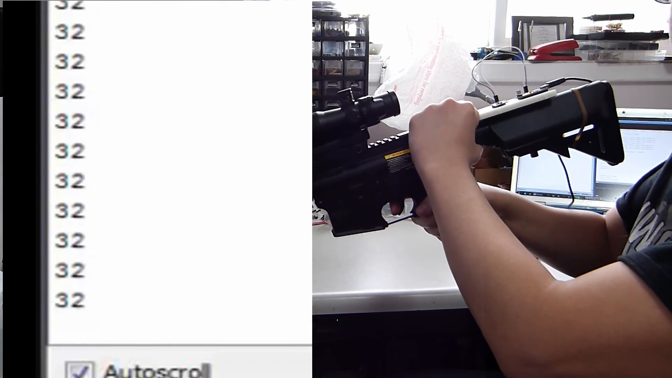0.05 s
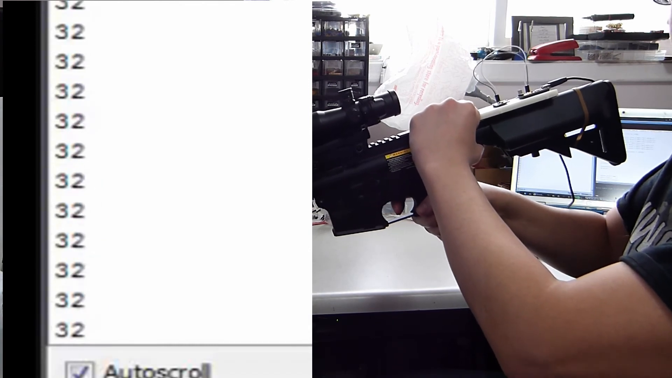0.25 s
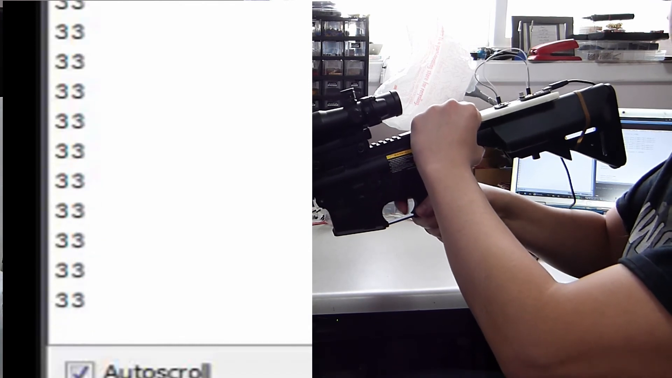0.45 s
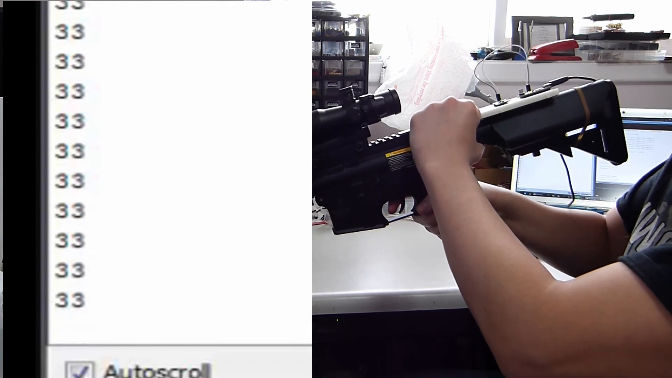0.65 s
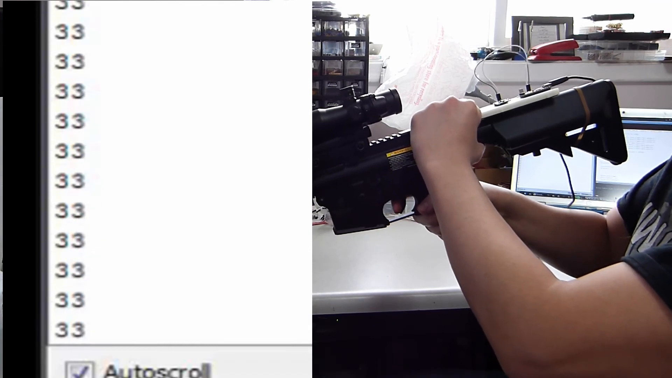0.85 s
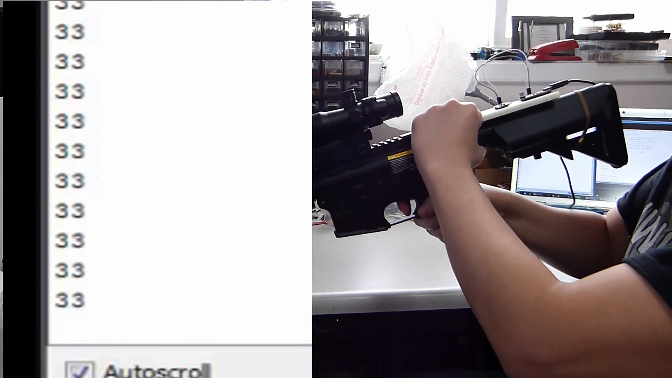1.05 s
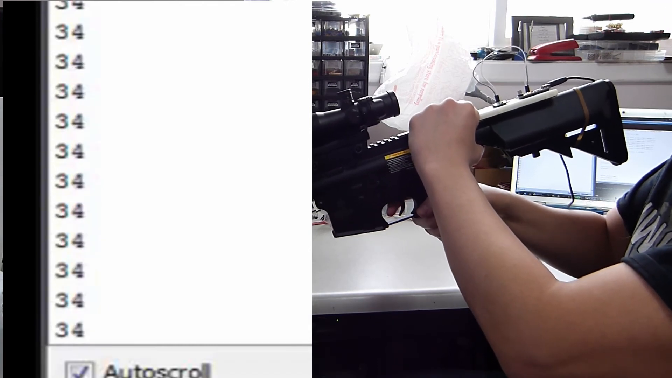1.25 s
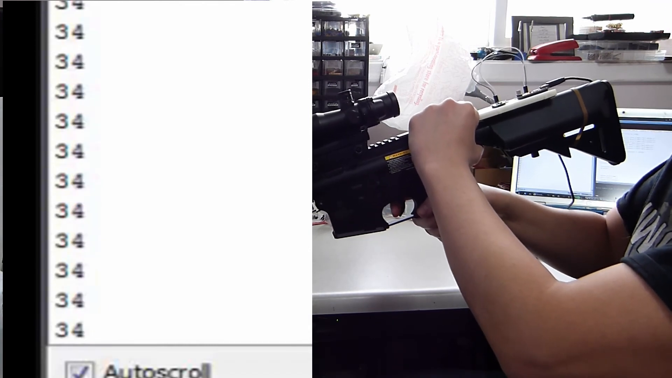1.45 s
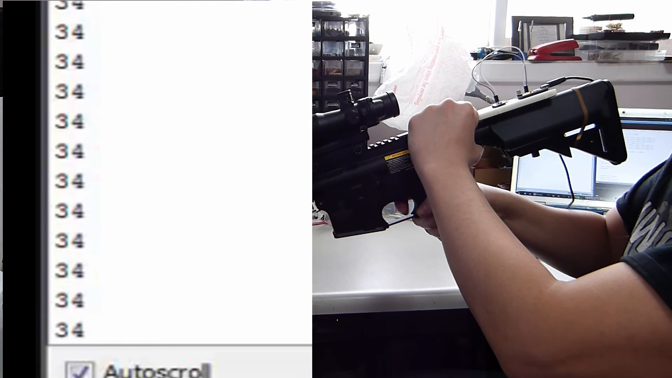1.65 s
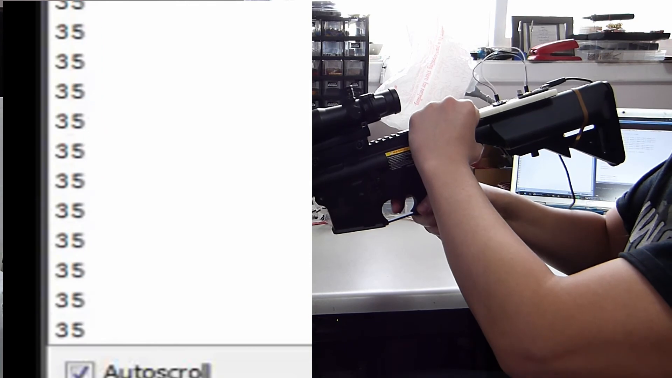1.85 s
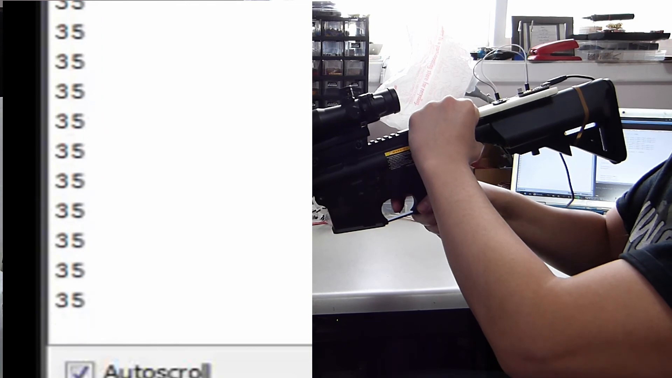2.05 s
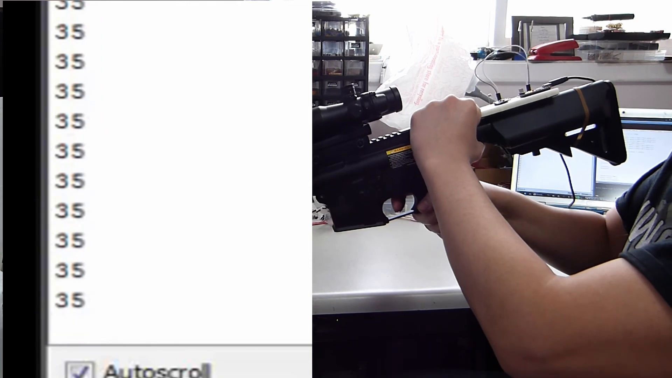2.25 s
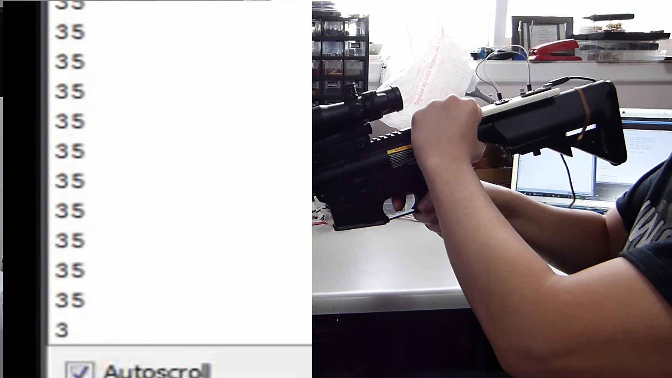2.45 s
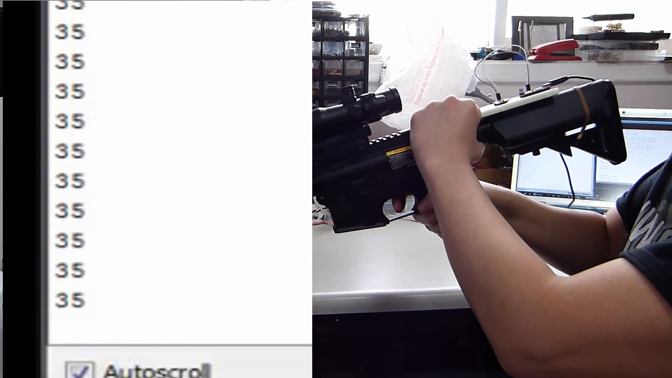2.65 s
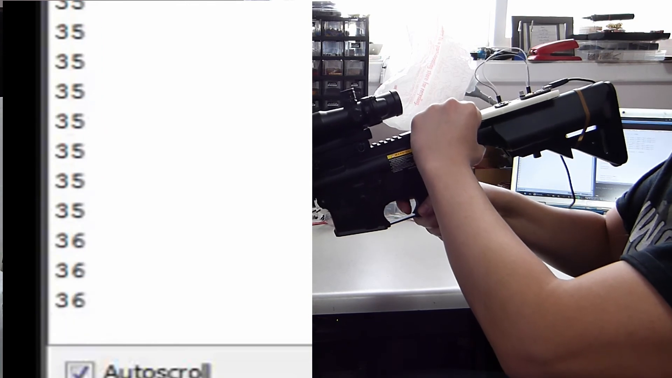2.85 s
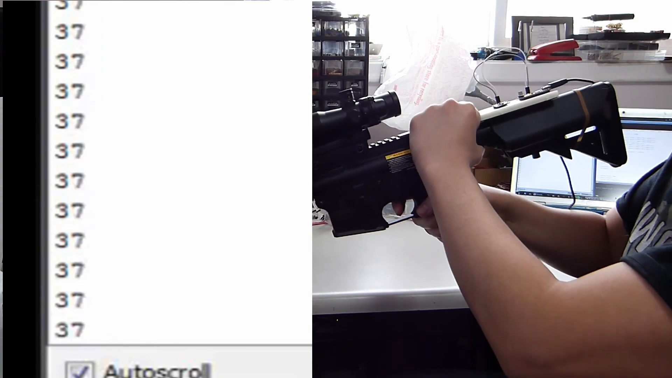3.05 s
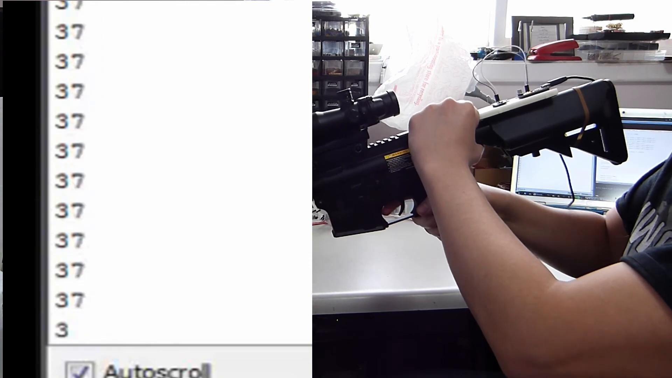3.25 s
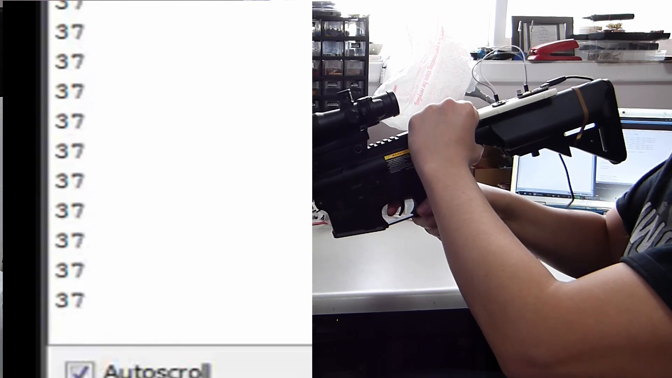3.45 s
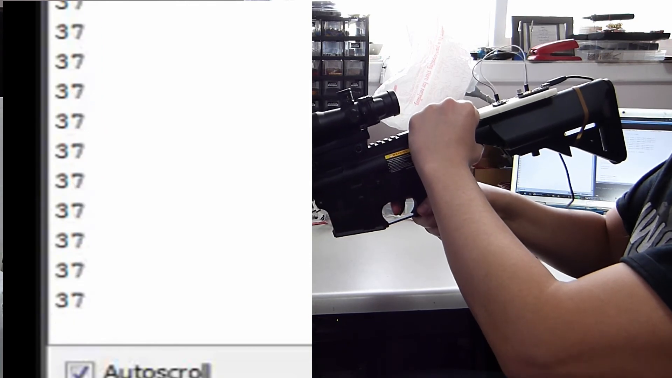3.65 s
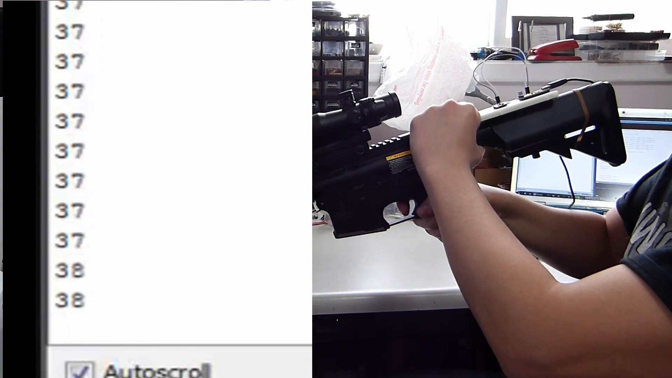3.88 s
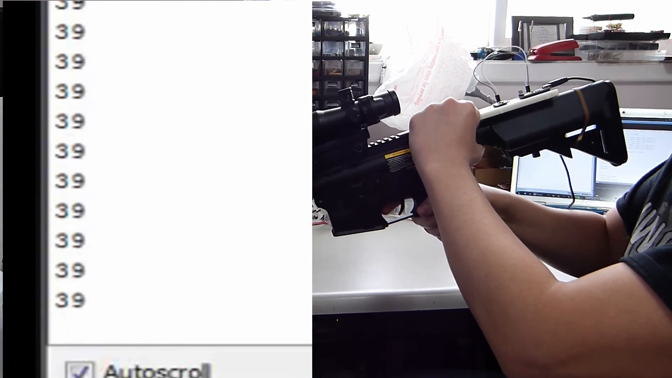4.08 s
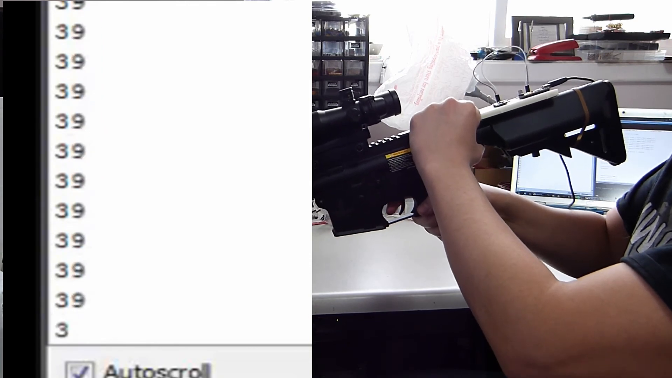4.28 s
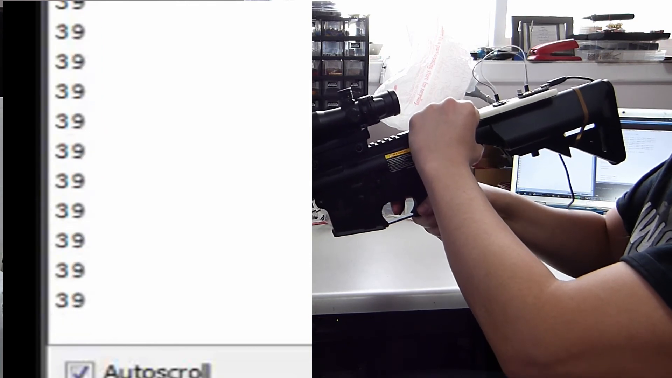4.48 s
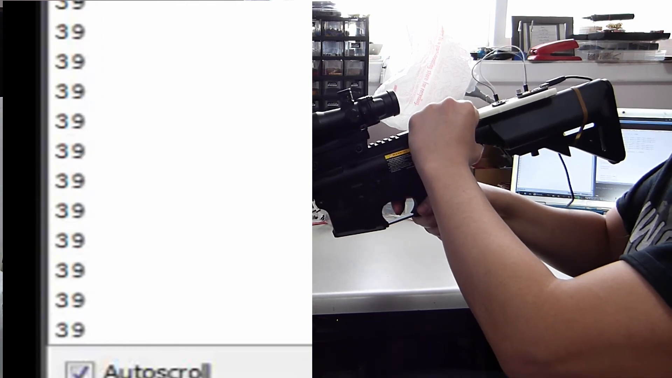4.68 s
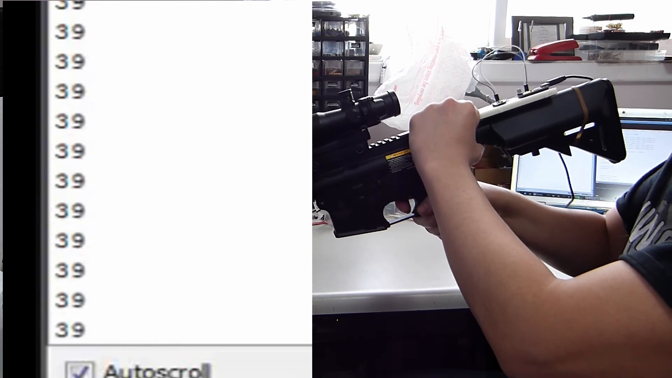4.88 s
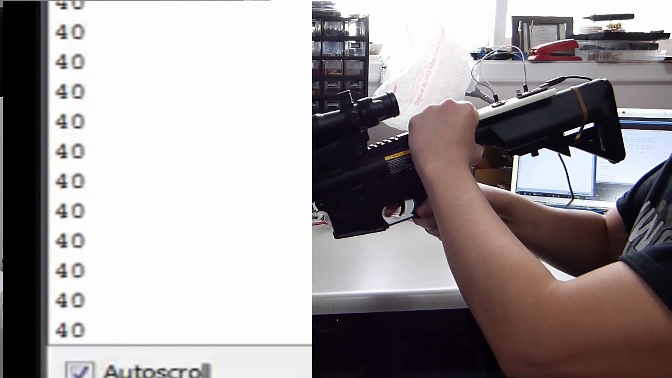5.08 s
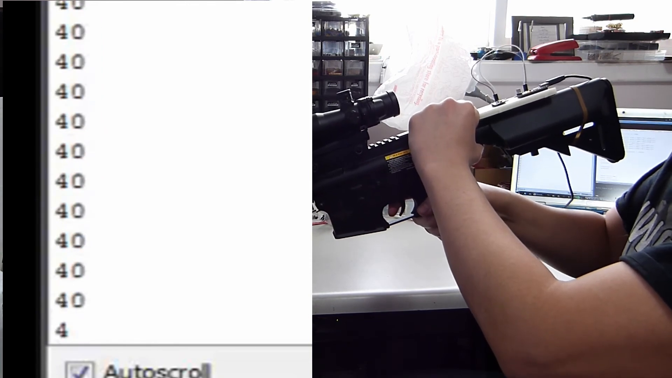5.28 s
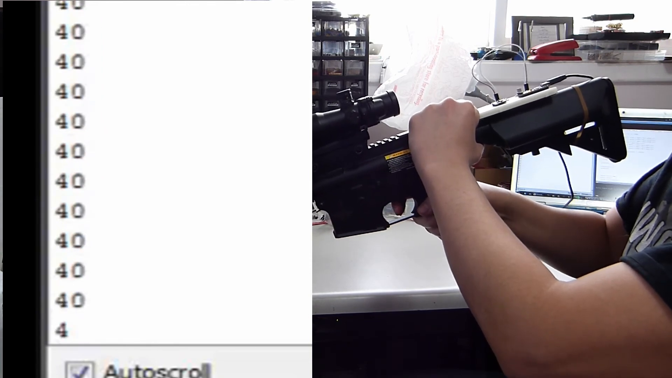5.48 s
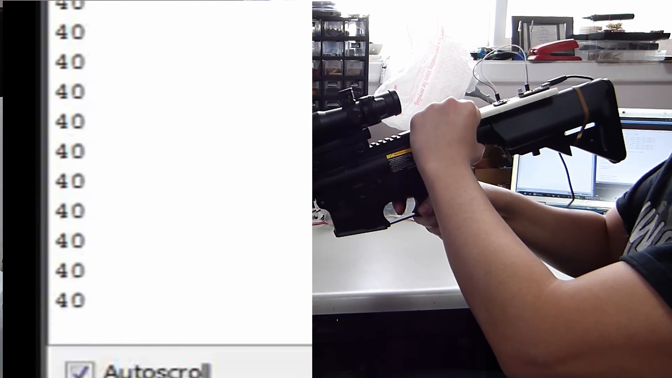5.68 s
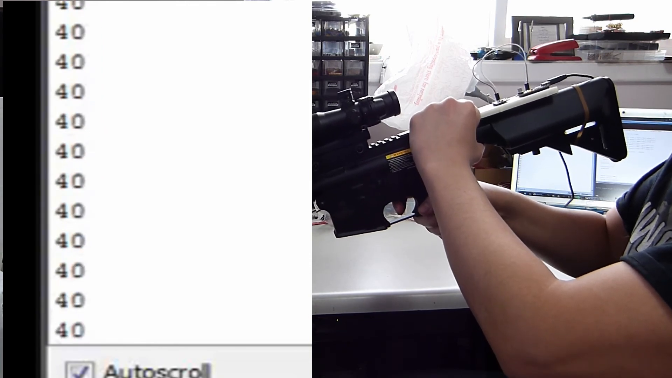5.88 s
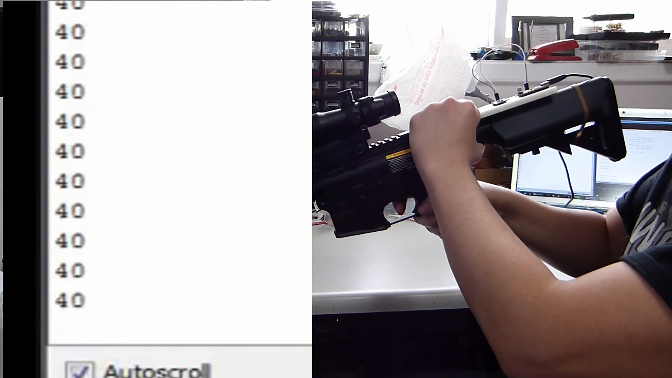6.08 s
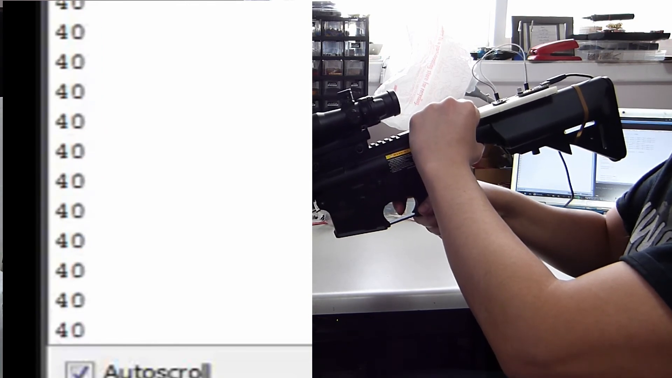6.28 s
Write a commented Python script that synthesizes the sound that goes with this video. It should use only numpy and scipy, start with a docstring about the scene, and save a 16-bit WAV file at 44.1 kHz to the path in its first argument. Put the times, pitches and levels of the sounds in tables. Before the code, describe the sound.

A close stereo microphone in a small, reflective workroom. At the start the ring of an earlier shot is still dying away over soft, low computer fan air and faint steady tones. At about 0.4 s a trigger clicks, a motor spins up with a gritty, rising gear grind lasting about a tenth of a second, and at 0.5 s the piston slams with a hard, bright crack and a rapid bouncing clatter. The same follows at 1.2 s and, after a very faint high squeak near 1.65 s, at 1.9 s. A longer pause leads to a quick pair at 3.0 and 3.1 s, the motor running through both, then another pair at 3.95 and 4.1 s. A last single lands at 5.1 s. Each blast leaves a short room tail and a faint metallic spring ring; the fan sinks, then slowly swells back until the end around 6.4 s.

```python
"""Electric airsoft rifle in a small workroom

Six trigger pulls fire the rifle, two of them running on into a second shot; a faint squeak precedes the third.
The trigger clicks, the motor spins the gears up against the spring, and the piston slams home and bounces.
The room rings on, at first still fading from an earlier shot, over a computer fan (coloured noise) and faint
steady tones that sink and swell with the recorder's gain."""
import sys
import numpy as np
from scipy import signal
from scipy.io import wavfile

SR = 44100
rng = np.random.default_rng(int(sys.argv[2]) if len(sys.argv) > 2 else 0)


def unload_wav(signal):
    """Save mono or channel-first audio to the path in sys.argv[1] as 16-bit WAV at rate SR, clipped to [-1, 1]."""
    wavfile.write(
        sys.argv[1],
        SR,
        np.round(np.clip(np.atleast_2d(signal).T, -1, 1) * 32767).astype(np.int16),
    )


N = 279153
LEAD = SR // 2  # samples ahead of the start, for the earlier shot
TIME = np.arange(-LEAD, N) / SR

# trigger pulls: (click [s], click level [dB], motor on [s], motor off [s])
PULLS = [(-.29, -45, -.26, -.145), (.389, -43, .412, .528), (1.074, -40, 1.098, 1.206),
         (1.733, -42, 1.755, 1.873), (2.861, -45, 2.888, 3.118), (3.826, -42, 3.846, 4.079),
         (4.939, -51, 4.973, 5.086)]
# shots: (piston blow [s], wind-up before it [s], grind [dB], hiss [dB], gear mesh [dB], crack [dB], thump [dB])
SHOTS = [(-.146, 0.081, -5, -1, 1.5, -2, -3.5), (0.5254, 0.12, -0.5, -1.1, 1, -1.5, -0.5),
         (1.2043, 0.11, 0, -2, -0.5, -0.5, .5), (1.8705, 0.12, -2.5, 0, 1, -1, -1.5),
         (3.0, .11, 4.5, 1.5, -3, 1, 0.5), (3.1158, .072, 0.5, -1.5, -11, 2.5, -1),
         (3.962, 0.12, 1.1, 0, 0, 1, -1), (4.0768, 0.078, -5.5, -1.5, -9, 2.5, -3),
         (5.0839, 0.11, 0.5, -1.5, 0.5, 2.5, .5)]


def piston(crack_db=2.5, crack_t60_s=.017, thump_db=7, rush_db=-14.5, rush_rise_s=0.0077, rush_hz=(130, 420),
           low_cut_hz=145, spring_db=-4):
    """The piston drives air down the barrel, hits the cylinder head and rebounds; body and spring ring."""
    # impact noise spectrum: (frequency [Hz], density [dB])
    crack_colour = [(50, -15), (200, -0.5), (600, -0.5), (2000, 0), (4000, -1), (7500, 3.5), (10000, 0.5),
                    (13000, -5), (15500, -14)]
    # rifle body modes: (frequency [Hz], level [dB], t60 [s])
    body_modes = [(132, -25, .04), (250, -14, 0.025), (300, -23.5, 0.032), (438, -15, 0.023),
                  (733, -30.5, 0.25), (770, -19, .03), (1460, -18, 0.023)]
    # spring and small steel parts: (frequency [Hz], level [dB], t60 [s])
    spring_modes = [(3260, -71.5, 1.2), (5497, -67, 1.3), (7190, -68, 1.3), (8000, -67.5, 2),
                    (8700, -65.5, 1.3)]
    blow_s, *_, shot_crack_db, shot_thump_db = np.transpose(SHOTS)
    crack = rattle(impacts(blow_s, shot_crack_db + crack_db), crack_colour, crack_t60_s)
    blows = clicks(blow_s, shot_thump_db + thump_db)
    # the puff of air swells as the piston gathers speed
    swell = sum(from_db(db) * (TIME < at) * np.exp(-np.abs(TIME - at) / rush_rise_s)
                for at, db in zip(blow_s, shot_thump_db))
    band = signal.butter(2, rush_hz, "band", fs=SR, output="sos")
    air = signal.sosfilt(band, rng.standard_normal((3, len(TIME))))
    air = unit_rms(air[0] + .8 * air[1:])  # one shared noise, one per channel
    low = ring(blows, body_modes) + from_db(rush_db) * swell * air
    low = signal.sosfilt(signal.butter(2, low_cut_hz, "high", fs=SR, output="sos"), low)
    low = low * from_db([[-1.2], [1.2]])
    return crack + low + from_db(spring_db) * ring(blows, spring_modes)


def impacts(times, db, count=4, contact_s=.003, contact_db=2.5, rebound_s=.0078, rebound_shrink=.9,
            rebound_db=-1, rebound_loss_db=4.5):
    """The piston presses into the cylinder head, then rebounds ever sooner and softer."""
    k = np.arange(count)
    gaps_s = rebound_s * rebound_shrink ** k * (1 + 0.07 * rng.standard_normal((len(times), count)))
    rebound_times = times[:, None] + np.cumsum(gaps_s, axis=1)
    rebound_levels_db = db[:, None] + rebound_db - rebound_loss_db * k
    rebounds = clicks(rebound_times.ravel(), rebound_levels_db.ravel())
    pressed = sum(from_db(level + contact_db) * (TIME >= s) * (TIME < s + contact_s)
                  for s, level in zip(times, db))
    return pressed / np.sqrt(contact_s * SR) + rebounds


def gears(jitter=.14, uneven_db=3, grit_per_s=3300, grit_db=3, low_cut_hz=520, free_run_db=-16.5,
          grind_level_db=-13, hiss_level_db=-12, mesh_level_db=-22):
    """Teeth knock at a rising rate, sweeping through the shell's modes, while their flanks grind and hiss."""
    # gearbox shell modes: (frequency [Hz], level [dB], t60 [s])
    shell_modes = [(545, -21.5, 0.057), (643, -12, .05), (753, -9.5, .06), (806, -1, .05),
                   (1000, -15, 0.01), (1215, -10.5, 0.048), (1485, -11.5, .025), (1537, -12.5, 0.022),
                   (2953, -12, 0.024), (3330, -8, 0.038), (3914, -11.5, 0.025), (4140, -14, .05),
                   (4440, -12, .025), (5550, -17, 0.043), (6330, -12.5, .05), (7490, -13, 0.014)]
    # noise spectrum of the grinding: (frequency [Hz], density [dB])
    grind_colour = [(100, -42), (330, -24.5), (560, 0), (850, 5.5), (1300, 4.5), (2200, 1.5), (3400, 4),
                    (5500, -1), (8000, -6.5), (11500, -6), (15000, -23.5)]
    # noise spectrum of the hiss: (frequency [Hz], density [dB])
    hiss_colour = [(100, -38), (300, -21.5), (650, -7.5), (2000, -5), (4000, -0.5), (7000, 1.5),
                   (10500, 0.5), (13000, -6), (15500, -16)]
    _, _, grind_db, hiss_db, mesh_db, _, _ = np.transpose(SHOTS)
    teeth_per_s, speed = motor()
    free = from_db(free_run_db) * speed
    grind_load = strain(grind_db, rise_s=.034, power=1.55, ease_db_per_s=39.5)
    hiss_load = strain(hiss_db, rise_s=.052, power=2.9, ease_db_per_s=15.5)
    mesh_load = strain(mesh_db, rise_s=0.021, power=1.6, ease_db_per_s=30)
    grind = from_db(grind_level_db) * (free + grind_load)
    hiss = from_db(hiss_level_db) * (free * speed + hiss_load)
    mesh = from_db(mesh_level_db) * (free + mesh_load)
    # backlash makes the teeth land unevenly in time and strength
    wobble = np.exp(jitter * flutter(size=50))
    teeth_passed = np.floor(np.cumsum(teeth_per_s * wobble) / SR)
    teeth = np.diff(teeth_passed, prepend=0) * from_db(uneven_db * rng.standard_normal(len(TIME)))
    knocks = ring(teeth * mesh, shell_modes)
    # countless small contacts of pinion, ratchet and piston rack
    grit = rng.random(len(TIME)) < grit_per_s / SR
    grit = grit * from_db(grit_db * rng.standard_normal(len(TIME)))
    grinding = rattle(grit * grind, grind_colour, t60_s=0.0069, patchy_db=2)
    hissing = rattle(grit * hiss, hiss_colour, t60_s=0.014, patchy_db=2.5)
    low_cut = signal.butter(4, low_cut_hz, "high", fs=SR, output="sos")
    return signal.sosfilt(low_cut, knocks + grinding + hissing)


def motor(top_teeth_per_s=1330, spin_up_s=.041, brake_s=.008):
    """Tooth rate climbs from each pull until the next; the speed share (0 to 1) is also braked at motor off."""
    teeth_per_s, speed = np.zeros((2, len(TIME)))
    for _, _, on, off in PULLS:
        spin = 1 - np.exp(-np.maximum(TIME - on, 0) / spin_up_s)
        teeth_per_s = np.where(TIME > on, top_teeth_per_s * spin, teeth_per_s)
        speed += spin * np.exp(-np.clip((TIME - off) / brake_s, 0, 20))
    return teeth_per_s, speed


def strain(shot_db, rise_s, power, ease_db_per_s, release_s=0.0066):
    """Gear load swells as the spring is drawn, eases as the motor gains speed, falls away at the release."""
    out = 0
    for (blow, wind_up, *_), db in zip(SHOTS, shot_db):
        age = np.clip(TIME - blow + wind_up, 0, wind_up)
        drawn = (1 - np.exp(-age / rise_s)) ** power
        release = np.exp(-np.clip((TIME - blow) / release_s, 0, 20))
        out = out + from_db(db - ease_db_per_s * age) * drawn * release
    return out


def trigger(click_db=8.0, creep_db=-25, kick_db=-27):
    """The trigger clicks, then slides on until the switch closes and the motor kicks."""
    # noise spectrum of the trigger: (frequency [Hz], density [dB])
    click_colour = [(200, -9.5), (1300, 9.5), (2500, 1), (5500, 2.5), (10000, -2), (15000, -23)]
    contacts = 0
    for s, db, on, _ in PULLS:
        creep = from_db(db + creep_db) * (TIME > s) * (TIME < on)
        contacts = contacts + creep + clicks([s, on], [db + click_db, kick_db])
    return rattle(contacts, click_colour, t60_s=0.03)


def squeak(at_s=1.655, width_s=0.039, pitch_hz=11400, glide=.05, db=-67):
    """A very faint, high sine of wandering pitch swells and fades between two shots."""
    pitch = pitch_hz * (1 + glide * np.clip(flutter(size=600), -2, 2))
    swell = np.exp(-((TIME - at_s) / width_s) ** 2)
    return from_db(db) * swell * np.sin(2 * np.pi * np.cumsum(pitch) / SR)


def room(x, first_echo_s=0.0019, build_up_s=0.0044):
    """Echoes from desk and walls thicken into a tail whose treble dies first; each side has its own paths."""
    # spectrum of the echoes: (frequency [Hz], density [dB])
    room_colour = [(60, -16.5), (130, -14.5), (240, -10.5), (450, -10), (800, -7), (1050, -10),
                   (1400, -6.5), (2000, -8), (3000, -3.5), (6000, -2.5), (10000, -2.5), (15000, -5)]
    # room decay: (frequency [Hz], t60 [s])
    decay = [(100, .46), (300, 0.66), (800, 0.68), (1400, 0.7), (2000, .5), (3500, 0.48), (7000, 0.36),
             (11000, 0.31), (15000, 0.22)]

    def tail(t, hz):
        thickening = 1 - np.exp(-np.maximum(t - first_echo_s, 0) / build_up_s)
        shape = thickening * dying(t, at_hz(decay, hz))
        return shape / np.sqrt(2 * np.sum(shape ** 2))

    echoes = sum(signal.fftconvolve(side[None], banded(room_colour, tail, size=32768), axes=1) for side in x)
    return echoes[:, :len(TIME)]


def fan(air_db=-52, tones_db=1):
    """Soft, steady air noise of the fan, with a few faint steady tones."""
    # spectrum of the air noise: (frequency [Hz], density [dB])
    fan_colour = [(25, -23.5), (60, -14.5), (120, -8.5), (250, -4.5), (350, -5.5), (500, -2), (800, -8.5),
                  (1300, -14.5), (2000, -18), (4000, -24.5), (8000, -32), (12000, -34.5), (15500, -45)]
    # steady tones: (frequency [Hz], rms level before tones_db [dB])
    steady_tones = [(119, -68), (344.5, -65.5), (516.8, -63.5), (602.9, -70.5)]
    air = unit_rms(banded(fan_colour, lambda t, hz: 1, balance=[(100, -1), (8000, 0)]))
    tones = sum(from_db(db + tones_db) * np.sqrt(2) * np.sin(2 * np.pi * (hz * TIME + rng.random()))
                for hz, db in steady_tones)
    return from_db(air_db) * air + tones


def rattle(contacts, colour, t60_s, patchy_db=0):
    """Contacts wake dense, quickly damped modes; shifting contact points favour changing bands."""
    energy_decay = dying(1 / SR, t60_s) ** 2
    strength = np.sqrt(signal.lfilter([1], [1, -energy_decay], contacts ** 2 + 1e-24))

    def envelope(t, hz):
        return strength * from_db(patchy_db * flutter(size=400)) if patchy_db else strength

    return banded(colour, envelope)


def ring(x, modes):
    """Parallel modes; a unit click starts each as a dying sine."""
    out = 0
    for hz, db, t60_s in modes:
        r, w = from_db(-60 / (t60_s * SR)), 2 * np.pi * hz / SR
        mode = signal.lfilter([0, np.sin(w)], [1, -2 * r * np.cos(w), r * r], x + 1e-18)
        out = out + from_db(db) * mode
    return out


def banded(spectrum, envelope, size=len(TIME), balance=None):
    """Stereo white noise under envelope(t, Hz), coloured band by band."""
    # likeness of the two channels: (frequency [Hz], correlation)
    likeness = [(50, .55), (150, 1), (700, .87), (1400, 0.6), (2500, .43), (4500, .33), (8000, -0.094),
                (15000, 0.076)]
    # left minus right of the rifle: (frequency [Hz], difference [dB])
    rifle_balance = [(150, -3), (600, -0.4), (2000, 0.5), (4000, 1), (8000, 1.5), (13000, 3)]
    balance = rifle_balance if balance is None else balance
    edges_hz = np.r_[np.geomspace(25, 400, 6), np.geomspace(560, 16000, 15)]
    t, out = np.arange(size) / SR, np.zeros((2, size))
    sides = np.array([[1], [-1]])
    white = rng.standard_normal((2, 2, size))  # neighbouring bands use different noise
    for k, (low, high) in enumerate(zip(edges_hz, edges_hz[1:])):
        hz = np.sqrt(low * high)
        sos = signal.butter(2, [low, high], "band", fs=SR, output="sos")
        mid, side = signal.sosfilt(sos, white[k % 2] * envelope(t, hz) + 1e-18)
        alike = np.clip(at_hz(likeness, hz), -1, 1)
        pair = np.sqrt((1 + alike) / 2) * mid + np.sqrt((1 - alike) / 2) * side * sides
        out += pair * from_db(at_hz(spectrum, hz) + sides * at_hz(balance, hz) / 2)
    return out


def clicks(times, db):
    """One impulse at each time."""
    out = np.zeros(len(TIME))
    np.add.at(out, np.round(np.asarray(times) * SR).astype(int) + LEAD, from_db(db))
    return out


def flutter(size):
    """Smooth chance that changes about every `size` samples; knots have spread 1."""
    knots = np.arange(0, len(TIME), size)
    return np.interp(np.arange(len(TIME)), knots, rng.standard_normal(len(knots)))


def dying(t, t60_s):
    """A decay of 60 dB in t60_s."""
    return from_db(-60 * t / t60_s)


def from_db(db):
    """Decibels to gain."""
    return 10 ** (np.asarray(db) / 20)


def unit_rms(x):
    """Scale to rms 1."""
    return x / np.sqrt(np.mean(x ** 2) + 1e-20)


def at_hz(points, hz):
    """Read a table on a log-frequency axis."""
    f, value = np.transpose(points)
    return np.interp(np.log(hz), np.log(f), value)


def smooth(x, seconds):
    """One-pole lag that starts at the first value."""
    r = np.exp(-1 / (seconds * SR))
    return x[0] + signal.lfilter([1 - r], [1, -r], x - x[0])


def gain_control(x, sense_s=.01, start_db=5, threshold_db=-18, squeeze_share=0.84, duck_s=.009,
                 recover_db_per_s=12.5):
    """Level above the threshold turns the gain down quickly; it recovers slowly, and starts turned down."""
    level_db = 10 * np.log10(smooth(np.mean(x ** 2, axis=0), sense_s) + 1e-12)
    recovered_db = recover_db_per_s * np.arange(N) / SR
    wanted_db = squeeze_share * np.maximum(level_db - threshold_db, 0)
    # hold the deepest cut so far, each released at the recovery rate
    held_db = np.maximum.accumulate(np.maximum(wanted_db + recovered_db, start_db)) - recovered_db
    return x * from_db(-smooth(held_db, duck_s))


def scene(rifle_db=-2, room_db=1.6):
    """The rifle close to the microphone, its room, the fan and the steady tones."""
    rifle = from_db(rifle_db) * (piston() + gears() + trigger() + squeak())
    return (rifle + from_db(room_db) * room(rifle) + fan())[:, LEAD:]


def record(dry, clip_level=1.0, cutoff_hz=15400):
    """The gain rides the shots, the loudest peaks are flattened and the top is cut."""
    x = gain_control(dry)
    clipped = x / (1 + (x / clip_level) ** 4) ** (1 / 4)
    return signal.sosfilt(signal.ellip(10, .1, 70, cutoff_hz, fs=SR, output="sos"), clipped)


dry = scene()
out = record(dry)
unload_wav(out)
```